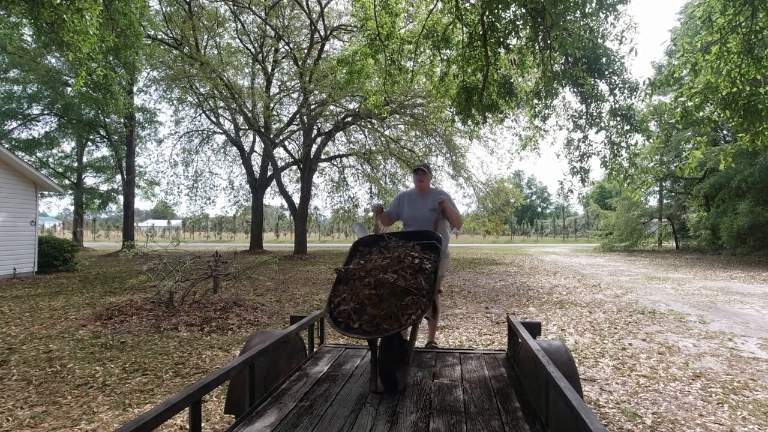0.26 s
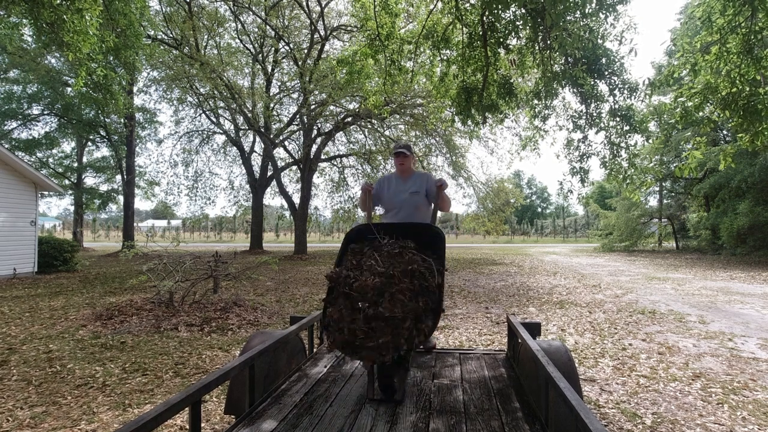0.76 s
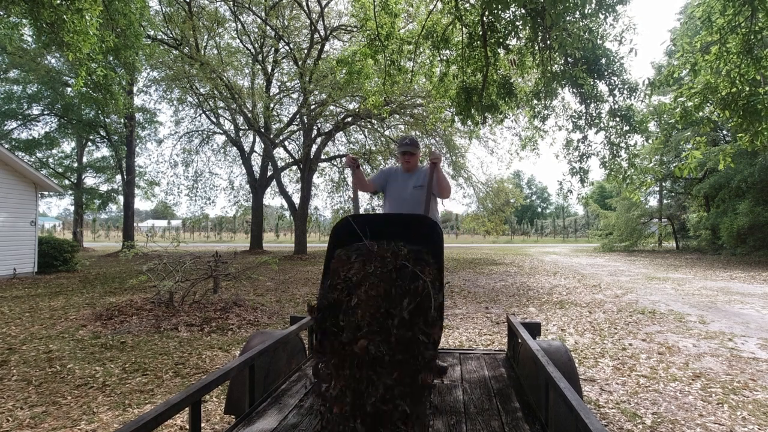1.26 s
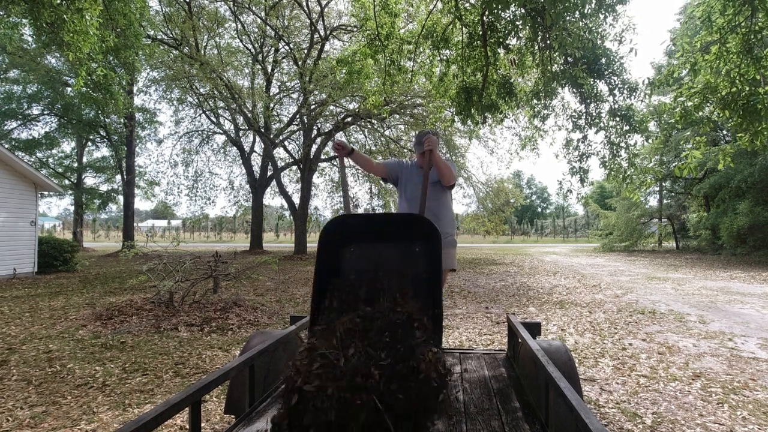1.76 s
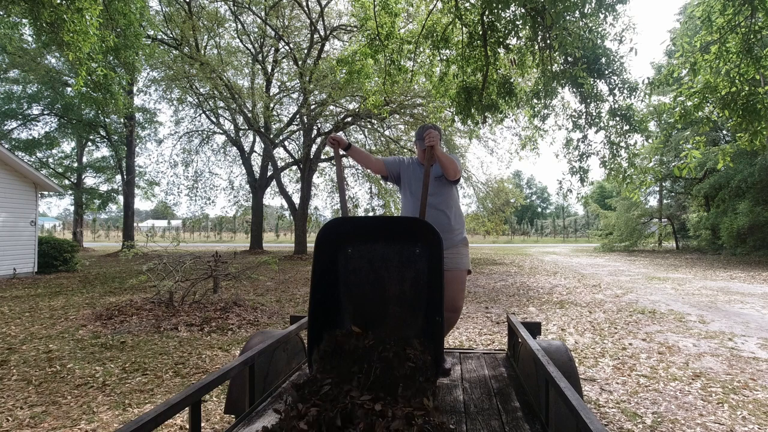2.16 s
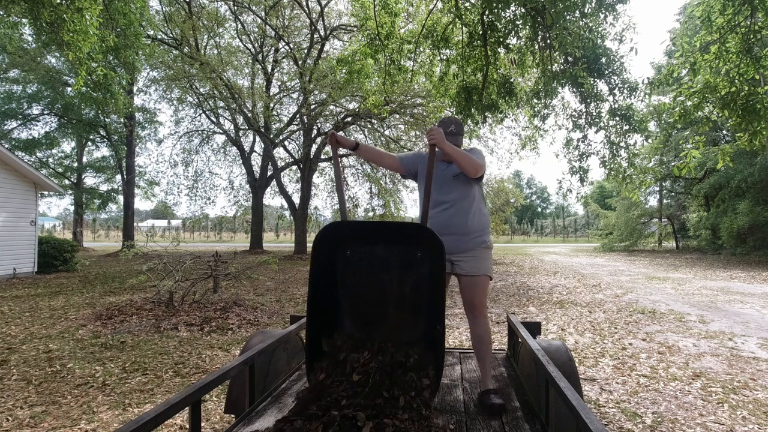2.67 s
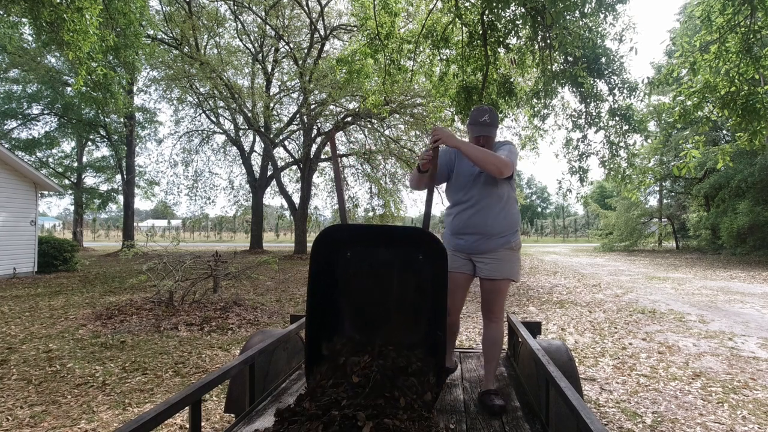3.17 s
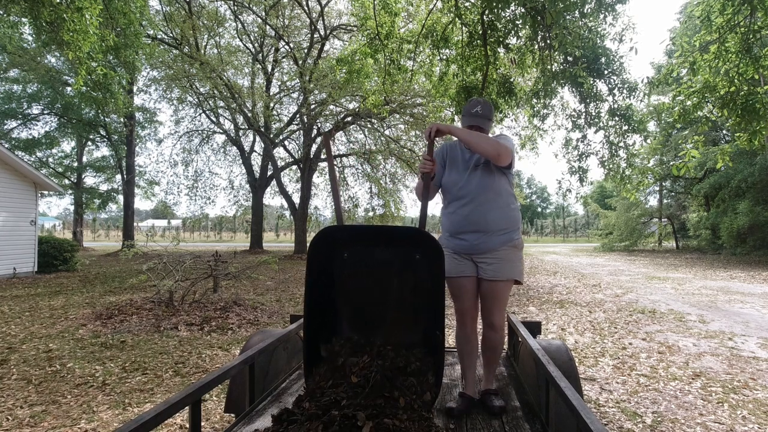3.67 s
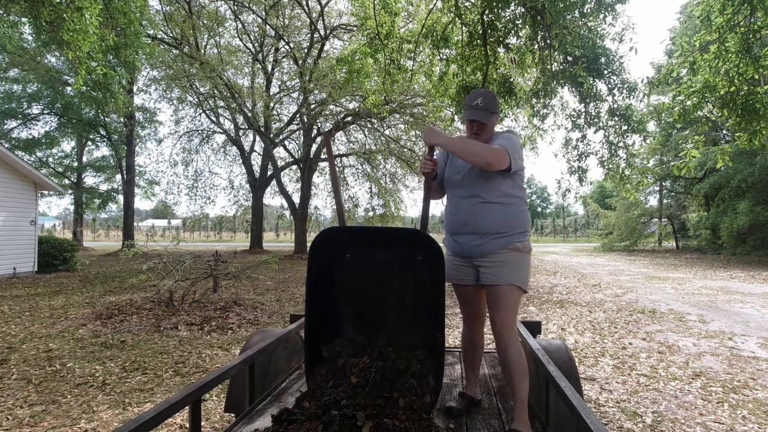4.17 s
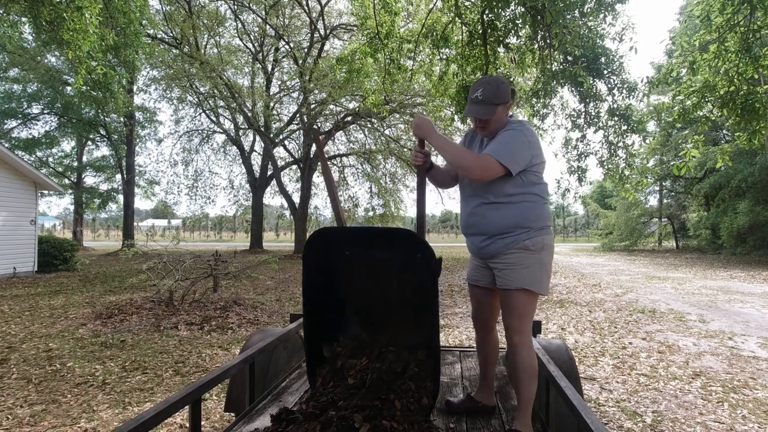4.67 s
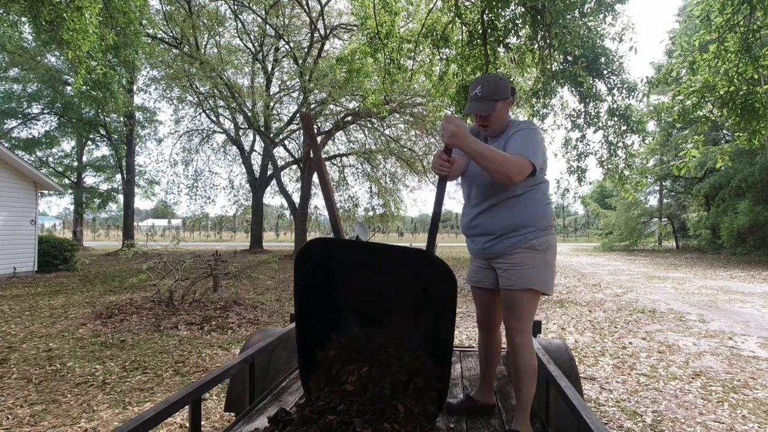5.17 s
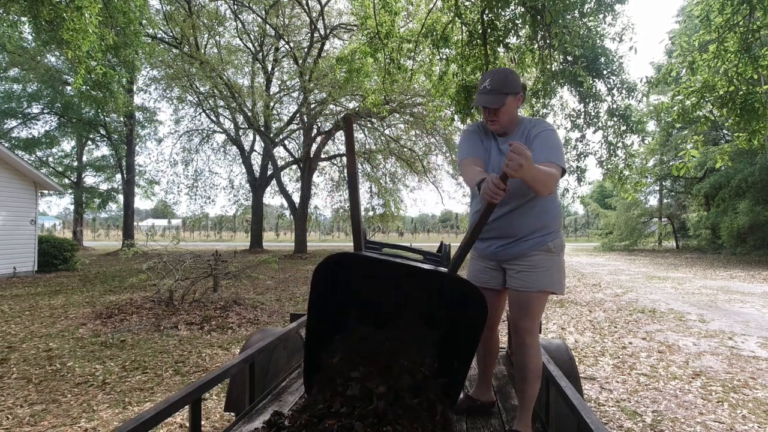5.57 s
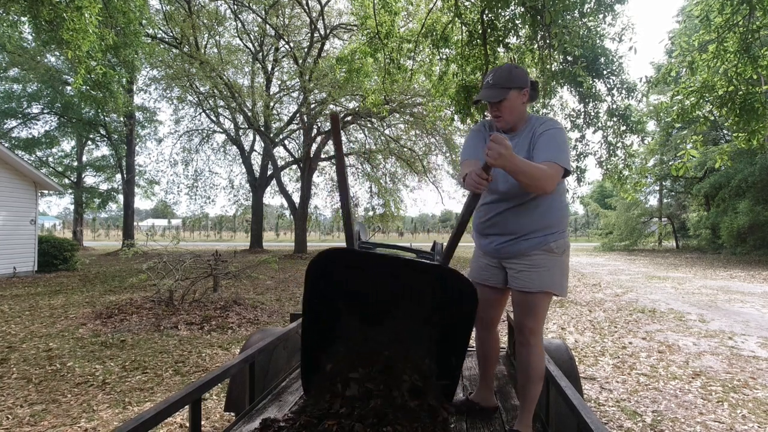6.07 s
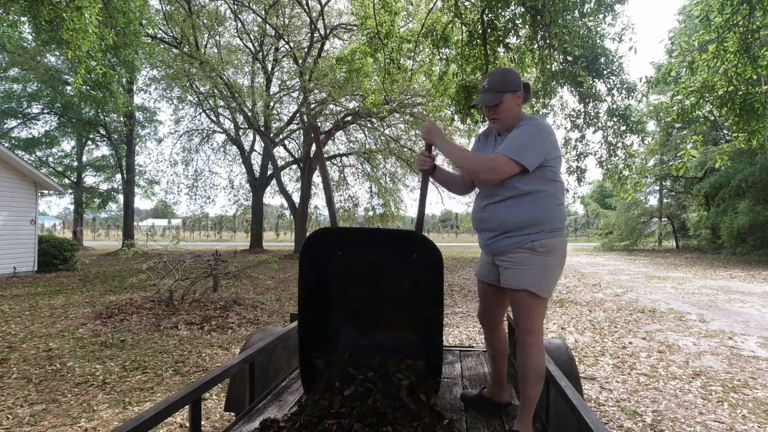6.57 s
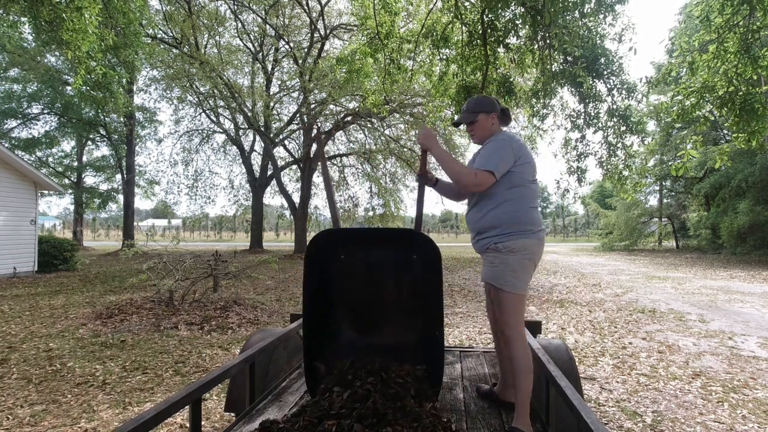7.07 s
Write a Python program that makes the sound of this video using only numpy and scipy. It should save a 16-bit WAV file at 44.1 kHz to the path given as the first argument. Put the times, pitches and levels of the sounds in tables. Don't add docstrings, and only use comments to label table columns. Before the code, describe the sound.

Low thud and plank rumble, then a long dry rush of leaves sliding out, small twig snaps, and a hard hollow clatter on wood.

```python
import sys
import numpy as np
from scipy import signal
from scipy.fft import rfft, irfft
from scipy.io import wavfile
from scipy.ndimage import uniform_filter1d

SR = 44100
rng = np.random.default_rng(int(sys.argv[2]) if len(sys.argv) > 2 else 0)


def undo_db(level):
    steps = np.asarray(level, float) / 20
    return 10 ** steps


def master_out(mix):
    frames = np.transpose(np.atleast_2d(mix))
    ceiling = np.clip(frames, -1, 1)
    pcm = np.round(ceiling * 32767).astype(np.int16)
    wavfile.write(sys.argv[1], SR, pcm)


N = 323253


def rms_one(x):
    return x / np.sqrt(np.mean(x ** 2) + 1e-20)


def in_time(rows):
    s, *columns = np.transpose(rows)
    return [np.interp(np.arange(N) / SR, np.maximum.accumulate(s), c) for c in columns]


def at_hz(points, hz):
    points_hz, points_db = np.transpose(points)
    return np.interp(np.log(hz), np.log(points_hz), points_db)


def place(out, start_s, sound):
    at = round(start_s * SR)
    out[at:at + len(sound)] += sound[:N - at]


def drift(rate):
    r = np.exp(-80 * np.pi * rate / SR)
    slow = signal.lfilter([1], [1, -2 * r, r * r], rng.standard_normal(N // 40 + 2002))[2000:]
    return np.interp(np.arange(N) / 40, np.arange(len(slow)), rms_one(slow))


def ring(clicks, hz, t60):
    r = undo_db(-60 / (t60 * SR))
    w = 2 * np.pi * hz / SR
    return signal.lfilter([0, np.sin(w)], [1, -2 * r * np.cos(w), r * r], clicks + 1e-18)


def band(x, low_hz, high_hz):
    return signal.sosfilt(signal.butter(2, [low_hz, high_hz], "band", fs=SR, output="sos"), x)


def grains(per_s, spread_db):
    sizes = undo_db(spread_db * np.minimum(rng.exponential(1, N), 5)) * rng.choice([-1, 1], N)
    return rms_one(sizes * (rng.random(N) < per_s / SR))


def evened(x, over_s):
    return x / np.sqrt(uniform_filter1d(x ** 2, int(over_s * SR)) + 1e-20)


def coloured(sources, spectrum, patchy_db, count):
    edges = 18 * 2 ** np.arange(0, 10, 1 / count)
    centres = np.sqrt(edges[1:] * edges[:-1])
    bands = []
    for k, (hz, low, high) in enumerate(zip(centres, edges, edges[1:])):
        if hz > spectrum[0][0]:
            gain = undo_db(at_hz(spectrum, hz) + patchy_db * drift(23))
            bands.append((hz, gain * band(sources[k % 2], low, high)))
    return bands


def swells(s, crest_db, rise_s, fall_s, rest_db):
    t = np.arange(0, N, 64)[:, None] / SR
    before = (s - t) / np.maximum(rise_s, 1e-3)
    after = (t - s) / np.maximum(fall_s, 1e-3)
    away = np.where(t < s, before, after)
    power = np.sum(undo_db(crest_db - 20 * away) ** 2, axis=1) + undo_db(rest_db) ** 2
    return np.interp(np.arange(N) / SR, t[:, 0], np.sqrt(power))


# pitch_hz, level_db (per Hz)
AIR_TONE = [(12, -31), (24, 1), (59, -2), (119, -1), (180, -41), (245, -6), (362, -21), (492, -10.5),
            (581, -17.5), (1630, -21), (1920, -24), (7740, -63), (15500, -26)]


def air():
    bands = coloured(rng.standard_normal((2, N)), AIR_TONE, patchy_db=1.8, count=2)
    return undo_db(-54.5) * rms_one(sum(x for hz, x in bands))


# crest_s, crest_db, rise_s, fall_s
HEAVES = [
    (.05, -33, .2, .4),
    (.22, -33, .3, 0.48),
    (.43, -30, .1, 0.37),
    (.65, -38, .3, 0.55),
    (.95, -36.5, .3, 0.44),
    (6.85, -25, .022, .35),
    (7.1, -31, .3, .6),
]


def heave():
    rocking = evened(band(rng.standard_normal(N), 14, 40.7), .15)
    return swells(*np.transpose(HEAVES), -66) * rocking


# crest_s, crest_db, pitch_hz, rise_s, fall_s
SWAYS = [(0.001, -28, 52.77, 0.014, 0.07), (.36, -43, 45.1, 0.34, -1), (.43, -27, 50.6, 0.041, 0.05),
         (.52, -27, 54.2, 0.14, 0.22), (.62, -26.5, 61.9, 0.067, 0.22), (.72, -41, 58.1, .1, -1),
         (0.811, -29, 58.27, 0.24, 0.1), (.92, -34.5, 44.8, 0.28, 0.1), (1.16, -36.5, 50.1, 0.2, 0.3),
         (1.29, -42, 45.15, .1, 0.6), (1.5, -46.5, 49.75, .2, 2), (1.85, -44, 55.76, .6, 0),
         (2.02, -39, 52, 0.22, 0.05), (2.16, -32, 55.4, 0.11, -0.07), (2.5, -57, 39.83, .5, 1),
         (2.79, -26.5, 59, 0.047, 0.16), (2.87, -25.5, 60.2, 0.089, 0.11), (2.94, -39, 59.96, .1, 0.26),
         (3.02, -41, 60.3, 0.16, 0.15), (3.1, -52, 62.05, 0.057, 0), (3.3, -54.5, 62.36, 0.62, 10),
         (4.3, -57.5, 34.98, 0.46, 3), (4.84, -50, 46.3, 0.28, 0), (5.35, -48, 57.1, 0.6, 1),
         (6.08, -50.5, 51.2, 0.8, 0), (6.49, -48, 50.07, .2, -0.1), (6.77, -49, 49.92, 0.39, -3),
         (6.83, -19, 38.25, 0.017, 0.33), (6.875, -21, 38.8, 0.05, 0.25), (6.94, -28, 36.7, .05, 0.2),
         (7.13, -28.5, 34.14, 0.27, 0.4)]


def deck():
    s, crest_db, pitch_hz, rise_s, fall_s = np.transpose(SWAYS)
    hz = np.interp(np.arange(N) / SR, s, pitch_hz)
    gain = swells(s, crest_db, rise_s, fall_s, -73)
    clean = 0.65
    swing = np.sqrt(2) * np.sin(2 * np.pi * np.cumsum(hz * (1 + 0.0587 * drift(12.56))) / SR)
    shaken = evened(band(rng.standard_normal(N), 28.4, 70.0), 0.107)
    return gain * (np.sqrt(clean) * swing + np.sqrt(1 - clean) * shaken)


# crest_s, crest_db, rise_s, fall_s
BOOMS = [(0.001, -33, .01, 0.43), (.57, -29.5, 0.2, 0.51), (1.07, -28.5, 0.035, .17),
         (1.64, -41, 0.13, .13), (2.2, -43, 0.24, 0.19), (2.59, -52, 0.022, 0.14), (2.77, -31, 0.041, 0.1),
         (3.81, -52, 0.96, 0.22), (4.52, -47.5, 1, .9), (4.798, -51, .3, 0.3), (5.12, -43, 0.075, 0.0596),
         (5.256, -37, .01, 0.24), (6.393, -44, 0.82, 1), (6.9, -41, .06, .3), (7.1, -55, 0.32, 0.39),
         (7.32, -40, 0.15, .2)]


def booms():
    slips = grains(1500, 3.74)
    boom = rms_one(band(slips, 78, 185)) + 1.05 * rms_one(ring(slips, 122.1, 0.69))
    return undo_db(-6.0) * swells(*np.transpose(BOOMS), -59.5) * evened(boom, 0.074)


# pitch_hz, level_db, t60_s
PLANK_NOTES = [(581, -6, 0.14), (680, 4, 0.086), (782, 6, 0.065), (874.4, -12.5, 0.31), (939, -4, 0.087),
               (1058, -4, 0.081), (1197, -9.5, 0.11), (1285, -11, 0.08), (1487, -14.5, 0.1),
               (1684, -36.5, 0.71)]
# crest_s, crest_db, rise_s, fall_s
SHUDDERS = [(0.001, -41.5, .01, 1.6), (.6, -40, 0.58, 3.8), (1.25, -31, 0.42, 0.77),
            (2.008, -29.5, 0.36, 0.57), (2.6, -52, 0.051, 0.18), (2.77, -29.5, 0.058, 0.11),
            (4.7, -48.5, 0.95, 0.29), (5.255, -41, 0.068, 0.44), (5.46, -43, 1.4, 0.6),
            (6.401, -49, 1.5, 1.76), (6.96, -33, .18, 0.34)]


def shudders():
    slips = grains(2500, 3.26) * undo_db(5.5 * drift(4.5))
    rumble = np.zeros(N)
    for k, (hz, db, t60) in enumerate(PLANK_NOTES):
        rumble += undo_db(0.5 * db) * ring(slips, hz, 0.39 * t60) * (-1) ** k
    return undo_db(-7.5) * swells(*np.transpose(SHUDDERS), -69) * evened(rumble, 0.16)


# pitch_hz, level_db, t60_s
GROAN_NOTES = [
    (220.7, -5, 0.2),
    (240.2, -14, 0.16),
    (346.2, -7, 0.49),
    (415, -13, 0.057),
]
# crest_s, crest_db, high_note_db (over the crest), rise_s, fall_s
DRAGS = [(.57, -57.5, 3.5, 0.83, 0.53), (1.0, -51, -22, 1.2, 0.088), (1.23, -60, 10.5, 0.2, 0.3),
         (1.6, -48, -22, 2.4, 0.46), (2.1, -44.5, -7.5, 0.68, 0.53), (2.66, -56, 0, 0.11, .3),
         (2.77, -38.5, -6.5, 0.086, 0.24), (4.58, -57, 3, 0.084, 0.59), (4.7, -50, -1.5, 0.25, 0.2),
         (4.8, -46, -15, 0.32, 0.7), (4.97, -51.5, -1, .2, .2), (5.12, -56, 8, 0.054, 0.74),
         (5.3, -44.5, -0.5, 0.35, 0.18), (5.49, -39.5, -12.5, 0.2, 0.29), (5.62, -48, -26, 0.29, 0.27),
         (6.749, -61, -3.5, 0.84, .2), (6.96, -47, 13.5, 0.13, 0.25), (7.03, -41.5, -6, 0.18, 0.29),
         (7.23, -55, -7, 0.21, 0.29)]


def groans():
    s, crest_db, high_db, rise_s, fall_s = np.transpose(DRAGS)
    low_gain = swells(s, crest_db, rise_s, fall_s, -74.5)
    high_gain = swells(s, crest_db + high_db, rise_s, fall_s, -74.5)
    slips = grains(1500, 3.74)
    notes = [undo_db(db) * rms_one(ring(slips, hz, t60)) for hz, db, t60 in GROAN_NOTES]
    groan = low_gain * evened(notes[0] + notes[1], 0.081) + high_gain * evened(notes[2] + notes[3], 0.13)
    bend_s = .0012
    return np.interp(np.arange(N) + bend_s * SR * drift(2.46), np.arange(N), groan)


# start_s, length_s, pitch_hz, width_hz, level_db
SQUEAKS = [(1.062, 0.055, 176, 68, -28.5), (1.063, 0.03, 860, 190, -31.5), (1.862, 0.11, 780, 97, -41),
           (2.597, .11, 217, 28, -46.5), (4.966, .036, 4300, 3300, -45), (2.829, .011, 4360, 250, -45),
           (2.9, 0.051, 200, 25, -44), (5.333, 0.21, 940, 35, -51.5), (6.1435, .035, 5100, 5500, -41.5),
           (3.257, 0.28, 2830, 130, -68.5), (6.148, .05, 1700, 68, -50.5), (6.173, 0.06, 1690, 144, -44),
           (6.275, 0.088, 1640, 290, -57), (6.188, .5, 1700, 130, -58.5), (6.868, .045, 4000, 3600, -41),
           (2.765, .025, 1200, 550, -39.5), (6.83, .19, 850, 740, -35), (6.878, 0.035, 3900, 300, -45),
           (6.918, 0.05, 4800, 3800, -41.5), (7.0, 0.32, 775, 30, -47)]


def squeaks():
    out = np.zeros(N)
    for s, length, hz, width, level_db in SQUEAKS:
        size = int(length * SR)
        noise = band(rng.standard_normal(SR // 2), hz - width / 2, hz + width / 2)
        swell = np.sin(np.pi * np.linspace(0, 1, size) ** 0.44)
        place(out, s, undo_db(level_db) * rms_one(noise[-size:]) * swell)
    return out


# start_s, peak_db, pitch_hz, t60_s, rise_cycles
TAPS = [(.572, -35, 220, 0.072, .5), (1.625, -35, 205, 0.067, 0.38), (1.945, -36, 280, .08, .5),
        (1.978, -36.5, 720, .06, 2.5), (2.7283, -20, 820, 0.027, .5), (2.729, -27.5, 390, .05, .5),
        (2.7345, -18.5, 280, 0.033, .7), (2.7368, -20, 754, 0.025, .8), (2.7365, -26, 545, .03, 0.54),
        (2.729, -31, 1250, .02, 0.46), (2.7285, -27, 610, 0.027, 0.55), (2.778, -34, 795, .04, 1.5),
        (2.767, -26, 204, 0.095, 0.49), (5.2525, -31, 830, 0.027, .4), (5.2515, -29, 380, 0.037, .4),
        (5.2525, -33.5, 1150, .025, .4), (5.27, -34, 334, .1, 2.5), (5.565, -37.5, 225, 0.48, 3.5),
        (5.5, -47, 1250, .25, 8), (7.2935, -30, 330, 0.028, .4), (5.305, -30, 230, 0.076, 1.5),
        (5.37, -34, 230, 0.2, 2.1), (5.426, -34, 233, 0.17, 1.3), (6.8068, -16.5, 270, 0.041, 0.29),
        (6.8068, -23.5, 750, .03, .4), (6.812, -17, 640, .05, 1.5), (6.811, -29, 1390, .06, .6),
        (6.8222, -10.5, 750, 0.021, 3.5), (6.832, -19, 255, .04, .4), (6.843, -19, 157, 0.055, 0.37),
        (6.876, -21.5, 800, 0.058, .6), (6.9, -25, 190, .1, .6), (6.915, -20, 230, .15, .6),
        (6.995, -26.5, 202, .12, .6)]
# start_s, peak_db, pitch_hz, t60_s, rise_cycles
TICKS = [(2.8692, -26, 3200, 0.0055, .4), (2.8694, -31, 5500, .005, .4), (2.871, -38, 3500, .008, .4),
         (2.8845, -32, 6300, .005, .4), (2.8846, -37, 3780, .005, .4), (4.3198, -34.5, 2150, 0.0098, .4),
         (4.3212, -43, 3200, 0.0046, .4), (4.3228, -40, 2300, .006, .4), (4.378, -42, 4400, .006, .4),
         (4.459, -45, 1490, .012, .4), (4.977, -45.5, 3100, .05, 6), (6.1445, -38, 3250, 0.084, 5),
         (6.1445, -42, 7800, .05, 5), (6.157, -40, 1650, 0.077, 6), (6.917, -30, 4090, .06, 9),
         (6.868, -35, 2360, .03, 3)]


def taps():
    out = np.zeros(N)
    t = np.arange(SR // 3) / SR
    for s, peak_db, hz, t60, rise in TAPS + TICKS:
        swell = (1 - np.exp(-t * hz / rise)) ** 2 * undo_db(-60 * t / t60)
        tap = np.sin(2 * np.pi * hz * t) * swell
        place(out, s, undo_db(peak_db) * tap / np.abs(tap).max())
    return out


# start_s, peak_db, pitch_hz, scattered_leaves_db
SNAPS = [(0.352, -35, 2470, -47), (.4778, -41, 4490, -51), (0.506, -40, 2440, -49.5),
         (0.594, -47, 2700, -48), (0.984, -22.5, 2560, -37), (1.093, -15, 5660, -43),
         (1.148, -25, 3000, -45), (1.2005, -19, 5640, -45), (1.213, -18, 5660, -43),
         (2.869, -29, 3200, -52), (3.0532, -46, 2350, -66), (3.1091, -40, 4574, -64.5),
         (3.147, -43, 7470, -75), (3.475, -45, 3220, -64), (3.5279, -48, 3195, -61),
         (3.7945, -51, 3000, -65), (3.855, -52, 2557, -70), (3.893, -48, 2550, -60),
         (3.9565, -56, 3000, -77), (3.989, -47, 7100, -61), (4.209, -47, 2830, -51.5),
         (4.2879, -44, 3630, -55.5), (4.3204, -35.5, 2220, -69.5), (4.378, -41, 4120, -55.5),
         (4.4563, -43, 2000, -60), (4.511, -37.5, 3670, -70), (4.579, -39, 2780, -66),
         (4.7828, -41, 2500, -56), (4.9294, -49, 2990, -64), (4.9684, -35, 3760, -56),
         (5.168, -34.5, 2440, -68), (5.252, -33.5, 3450, -48.5), (6.1446, -37, 3300, -41),
         (6.8106, -35, 2500, -40.5), (6.8716, -25.5, 2338, -43), (6.884, -31, 3900, -50),
         (6.9193, -29, 4080, -40.5), (6.93, -33, 6500, -49), (6.955, -45, 6800, -54),
         (7.1044, -43, 7000, -70), (7.1434, -41.5, 6504, -64), (7.21, -50.5, 4200, -56.5),
         (7.3067, -52, 4500, -71)]


def snaps():
    out, size = np.zeros(N), SR // 5
    t60_s = 0.023
    for s, peak_db, hz, _ in SNAPS:
        burst = rng.standard_normal(size) * undo_db(-60 * np.arange(size) / (t60_s * SR))
        burst[0] = 4.6
        snap = band(burst, 1360, 5300) + undo_db(5.5) * band(burst, hz * 0.74, hz * 1.21)
        place(out, s, undo_db(peak_db) * snap / np.abs(snap).max())
    return out


# pitch_hz, level_db, t60_s
TUB_NOTES = [(122, -67, 0.075), (150, -38, 0.12), (192.6, -6, 0.18), (218.3, -7, 0.4), (248.4, -6.5, 0.32),
             (304, -2.5, 0.07), (331.6, -3.5, 0.13), (403, 1.5, 0.071), (467, -7, 0.063)]
# start_s, hollow_db, hard_db, ring_length (factor), contact_s
KNOCKS = [(.068, -49, -50, 0.8, .0068), (0.565, -47, -66, .94, .005), (0.837, -47, -42, 2.8, 0.0042),
          (1.028, -54, -34.5, 1.5, 0.011), (1.066, -36, -26.5, 0.57, 0.013),
          (1.11, -32.5, -26.5, 0.43, 0.028), (1.232, -32.5, -31, 0.66, 0.014), (1.9, -37, -40, 1.65, 0.021),
          (2.7277, -48, -44, 0.4, 0.0041), (2.736, -25.5, -40, 0.42, 0.0034),
          (2.764, -32, -42, 1.4, 0.0074), (4.316, -75, -52, 0.45, 0.0033), (5.252, -41, -35, 0.39, 0.0017),
          (5.29, -42, -48, 0.79, 0.0075), (5.67, -55, -43, .4, .006), (6.807, -24, -26, 0.54, .013),
          (6.82, -27, -22.5, 0.47, .008), (6.844, -22, -29.5, 0.97, 0.012),
          (6.868, -24.5, -26, 0.79, 0.016), (6.9, -26, -24, 0.45, 0.022), (6.915, -24, -29, 0.45, 0.025),
          (6.949, -27, -42, 0.99, 0.016), (7.222, -55, -45.5, 0.7, 0.0087), (7.294, -39, -65, 0.26, 0.0046)]


def knocks():
    out, size = np.zeros(N), SR // 2
    notes = TUB_NOTES + PLANK_NOTES
    soft = signal.butter(2, 1700, fs=SR, output="sos")
    for s, hollow_db, hard_db, length, touch_s in KNOCKS:
        crunch = rng.standard_normal(SR // 20)
        contact = np.zeros(size)
        contact[:len(crunch)] = crunch * np.exp(-np.arange(len(crunch)) / (touch_s * SR))
        contact[0] = 1.8
        contact = signal.sosfilt(soft, contact / np.sqrt(np.sum(contact ** 2)))
        blow = undo_db(hard_db - 8.0) * band(contact, 250, 2700)
        parts = [hollow_db - 0.5] * len(TUB_NOTES) + [hard_db - 6.5] * len(PLANK_NOTES)
        for (hz, db, t60), part_db in zip(notes, parts):
            blow += undo_db(part_db + db + 2.9 * rng.normal()) * ring(contact, hz, t60 * length)
        place(out, s, blow)
    return out


def echoes(x):
    out, dull = x.copy(), band(x, 330, 2400)
    for lag_s, level_db in [(.004, -34), (.011, -10.5)]:
        lag = int(lag_s * SR)
        out[lag:] += undo_db(level_db) * dull[:-lag]
    return out


# time_s, rustle_db, dryness_db
FLOW = [(0, -55.5, -11), (.57, -54.5, -2), (.63, -39, -10.5), (.86, -38.5, -1.5), (1.18, -35.5, -1),
        (1.29, -30, 1.5), (2.02, -28.5, -2.5), (2.4, -37, 0), (2.7, -49, 2.5), (3.15, -59, -6),
        (3.19, -66, -2), (3.78, -71.5, -12), (6.2, -68, -8), (6.26, -53.5, -10), (6.6, -48, -11),
        (6.79, -48.5, -10.5), (6.805, -64, -4), (7.33, -82, -8)]
# crest_s, crest_db, dryness_db, rise_s, fall_s
STIRS = [(.37, -59, 3, 0.75, 0.23), (3.56, -55.5, -12.5, 0.063, .15), (3.82, -62.5, -6.5, 0.09, 1.5),
         (1.225, -32.5, 4, 0.068, 0.14), (4.62, -58, -15, 0.32, 0.48), (4.72, -51.5, -14, 0.14, 0.11),
         (4.975, -54, -12, .01, 0.076), (4.76, -51.5, -12.5, 0.47, 0.18), (5.2, -53, -10, 0.66, 3.5),
         (5.62, -49.5, 1.5, 0.42, 1.2), (6.82, -45, -17, .01, 0.22), (6.885, -41, -21, 0.044, 0.11),
         (6.935, -40.5, -20, 0.12, 0.089), (7.106, -57.5, -6.5, 0.012, 0.35), (7.325, -57, -8, 0.018, 0.16)]


def rustle(offset_db, per_dry_db):
    flow_db, flow_dry_db = in_time(FLOW)
    scatter = [(s, db, -9.5, 0.0033, 0.086) for s, _, _, db in SNAPS]
    s, crest_db, dry_db, rise_s, fall_s = np.transpose(STIRS + scatter)
    stirred = swells(s, crest_db + per_dry_db * dry_db, rise_s, fall_s, -120)
    return undo_db(offset_db) * np.hypot(undo_db(flow_db + per_dry_db * flow_dry_db), stirred)


def crisp_leaves():
    cracks = grains(700, 1.7)
    dealt = rng.integers(0, 24, size=N)
    pitches = np.geomspace(2200, 9500, num=24)
    return rms_one(sum(ring(cracks * (dealt == k), hz, 110 / hz) for k, hz in enumerate(pitches)))


# pitch_hz, level_db (per Hz)
LEAF_TONE = [(290, -4.5), (500, -6.5), (537, -27.5), (851, 4), (983, -3.5), (1560, 3), (1850, -0.5),
             (2500, -4), (2810, 2), (3190, -1.5), (6460, -1), (8300, -9.5), (10500, -17.5), (15500, -25.5)]
# pitch_hz, width_hz, level_db
TUB_VOICE = [(820, 150, -1.5), (1560, 150, 2.5), (2830, 230, 0.5), (4220, 99, 1), (3640, 68, 0),
             (5660, 160, 2.5), (6390, 150, 2), (7650, 200, 3)]


def leaves():
    coarse_hz, sheen_hz, fine_hz = 2500, 5000, 8000
    clumps = undo_db(0.3 * drift(16.0) + 0.78 * drift(70))
    crackles = [grains(7000, 1.7) * clumps, grains(7000, 1.5) * clumps]
    bands = coloured(crackles, LEAF_TONE, patchy_db=0.95, count=3)
    coarse = sum(x for hz, x in bands if hz < coarse_hz)
    body = sum(x for hz, x in bands if coarse_hz <= hz < fine_hz)
    sheen = sum(x for hz, x in bands if sheen_hz <= hz < fine_hz)
    fine = sum(x for hz, x in bands if hz >= fine_hz)
    plain = rustle(0, 0)
    body = body + sheen * (rustle(0, 0.61) / plain - 1)
    out = plain * (0.86 * rms_one(body) + 0.5 * crisp_leaves())
    out = out + rustle(-6, -0.39) * rms_one(coarse)
    out = out + rustle(-4.5, 1.0) * rms_one(fine)
    for hz, width, db in TUB_VOICE:
        b, a = signal.iirpeak(hz, hz / width, fs=SR)
        out = out + (undo_db(db) - 1) * signal.lfilter(b, a, out)
    return out


def scene():
    background = air() + heave() + deck()
    rubbing = booms() + shudders() + groans()
    blows = echoes(knocks() + snaps() + squeaks()) + taps()
    mix = background + rubbing + blows + leaves()
    return np.stack([mix, mix])


THIN_S = [1.17, 1.28, 1.532, 1.812, 1.896, 1.98, 2.047, 2.68, 3.19, 4.84, 5.67, 5.95, 7.19]


def thin_out(x):
    out, size = x.copy(), 2048
    window, hz = signal.windows.tukey(size, 1), np.fft.rfftfreq(size, 1 / SR)
    for s in THIN_S:
        at = round(s * SR) - size // 2
        frame = out[:, at:at + size] * window
        lines = rfft(frame)
        usual = uniform_filter1d(np.abs(lines), size=60, axis=1)
        kept = (np.abs(lines) > 1.35 * usual) & (hz < 10000)
        change_db = np.where(kept, 3.5, -16) * (hz > 260)
        out[:, at:at + size] += irfft(lines * undo_db(change_db)) - frame
    return out


def band_limit(x):
    return signal.sosfilt(signal.butter(12, 15670, fs=SR, output="sos"), x)


def record(dry):
    rounded = 0.56 * np.tanh(dry / 0.66)
    top_cut = signal.cheby2(10, 50, 16200, fs=SR, output="sos")
    finished = thin_out(signal.sosfilt(top_cut, rounded))
    return band_limit(finished)


dry = scene()
out = record(dry)
master_out(out)
```